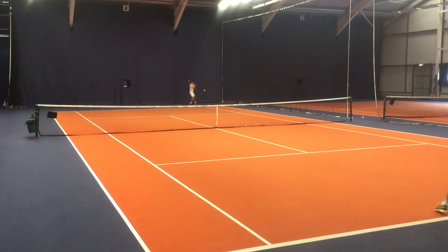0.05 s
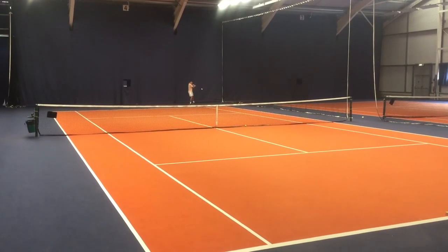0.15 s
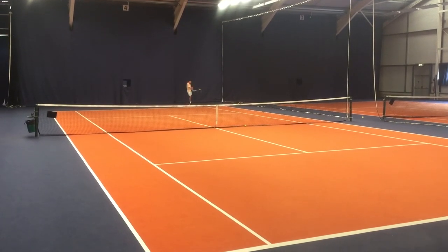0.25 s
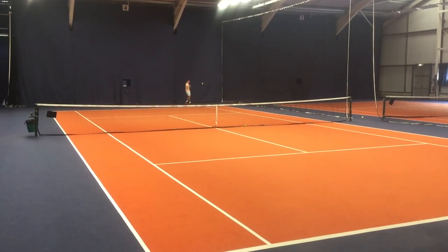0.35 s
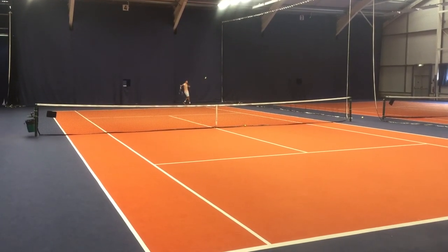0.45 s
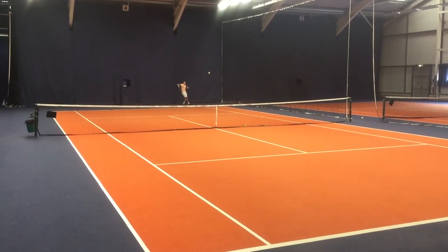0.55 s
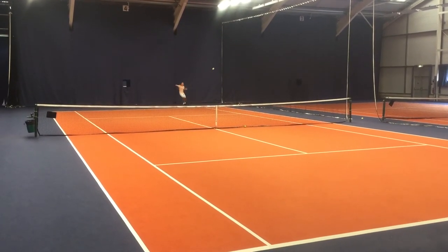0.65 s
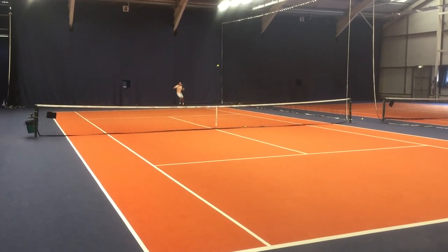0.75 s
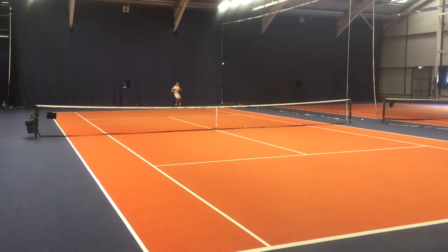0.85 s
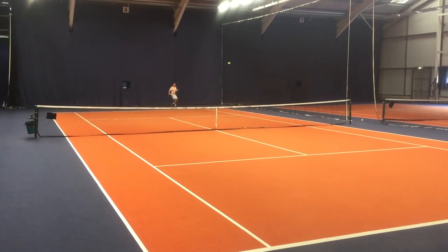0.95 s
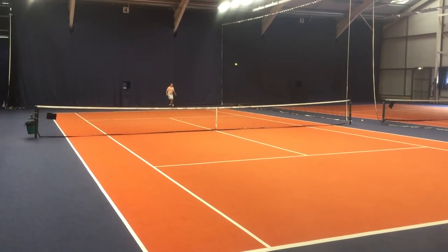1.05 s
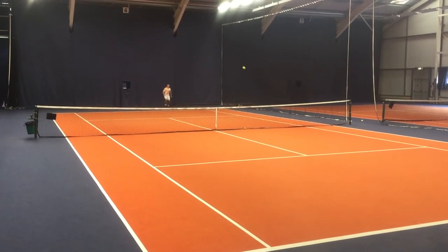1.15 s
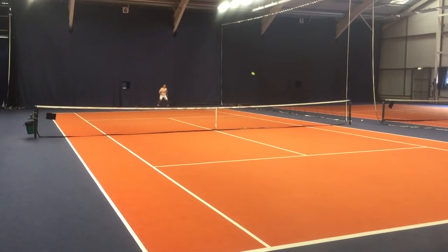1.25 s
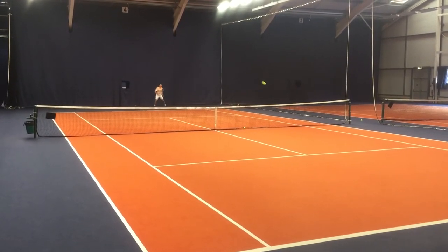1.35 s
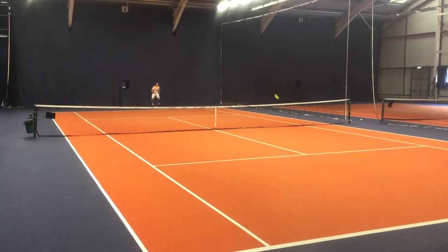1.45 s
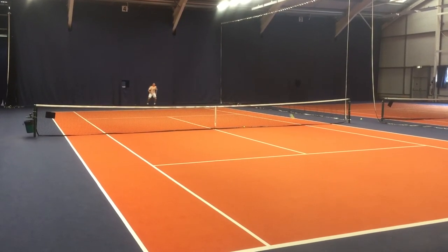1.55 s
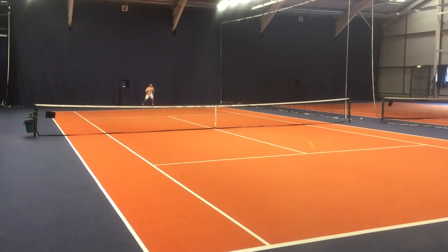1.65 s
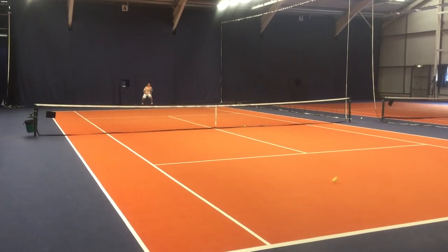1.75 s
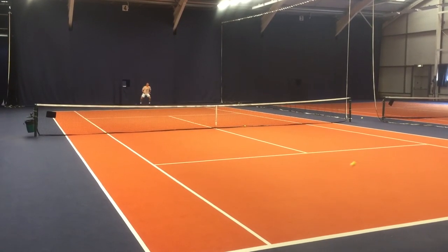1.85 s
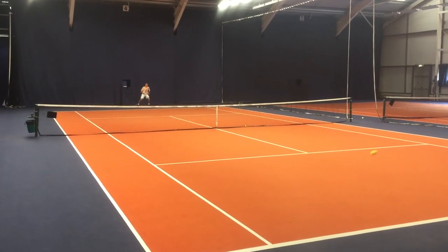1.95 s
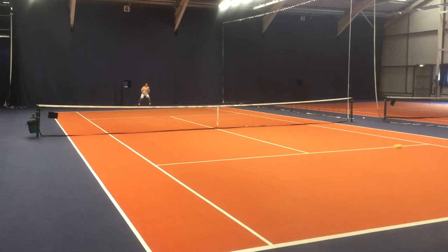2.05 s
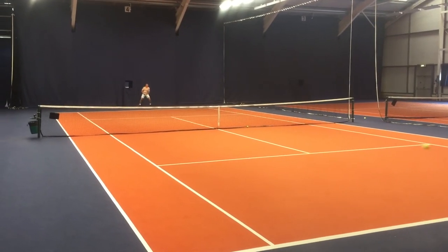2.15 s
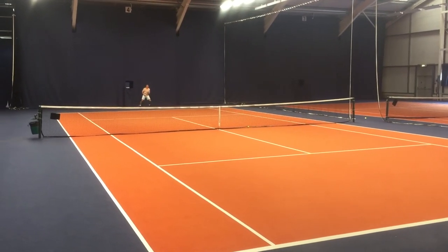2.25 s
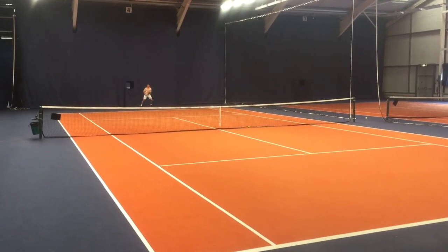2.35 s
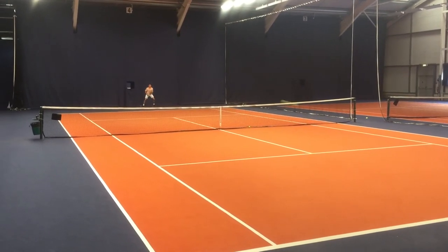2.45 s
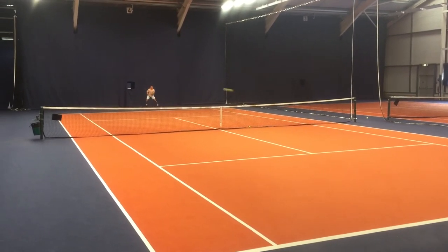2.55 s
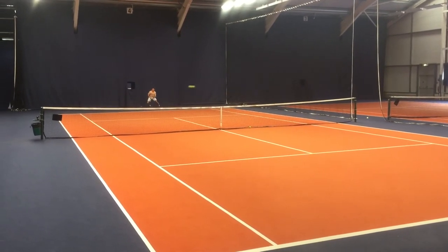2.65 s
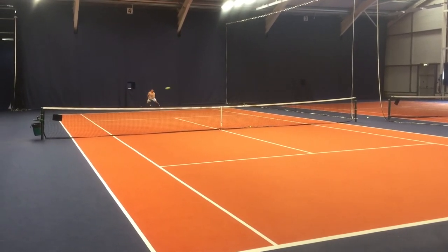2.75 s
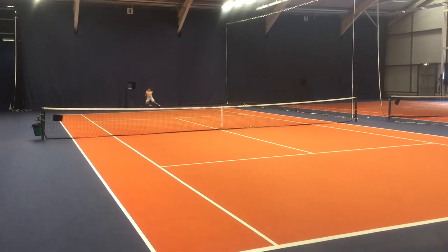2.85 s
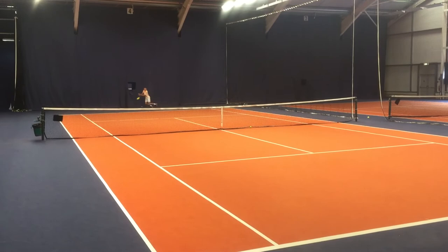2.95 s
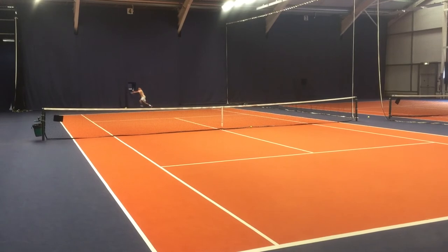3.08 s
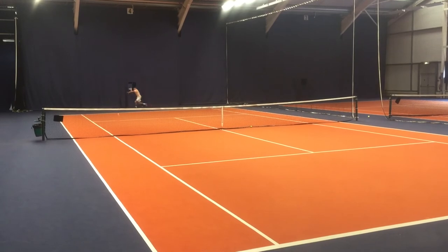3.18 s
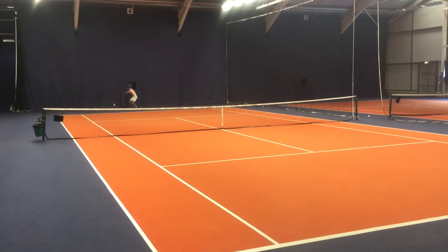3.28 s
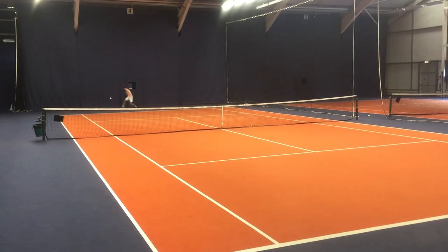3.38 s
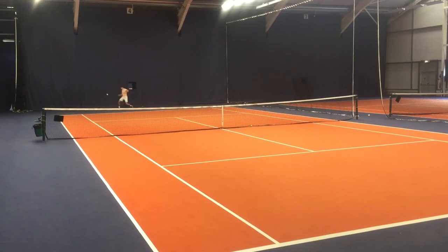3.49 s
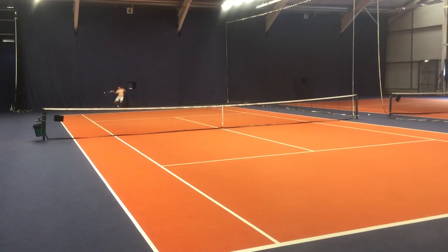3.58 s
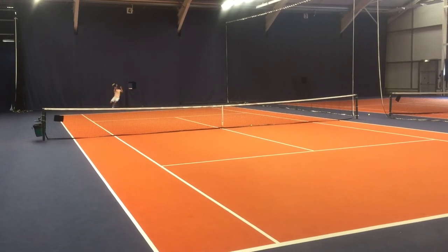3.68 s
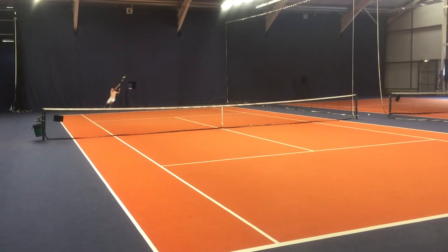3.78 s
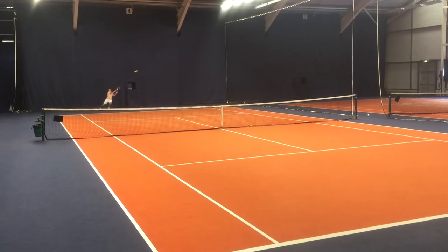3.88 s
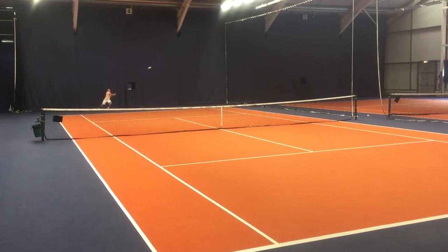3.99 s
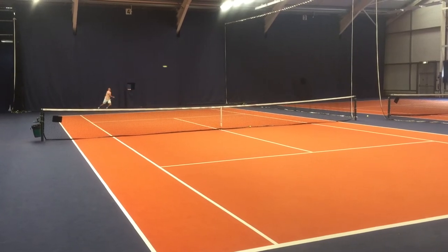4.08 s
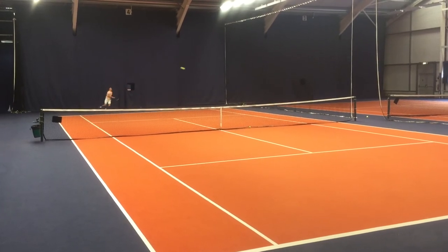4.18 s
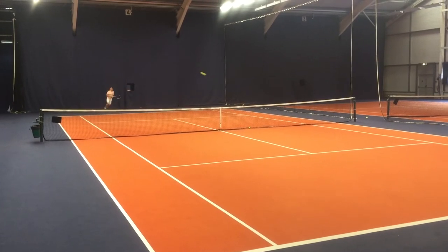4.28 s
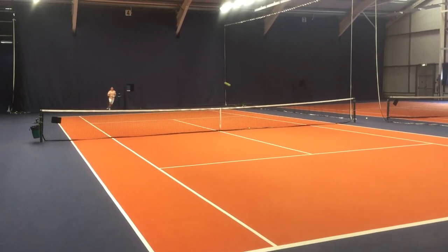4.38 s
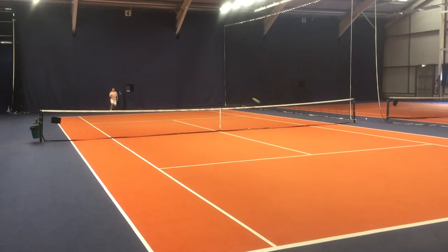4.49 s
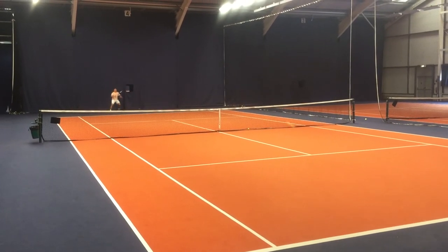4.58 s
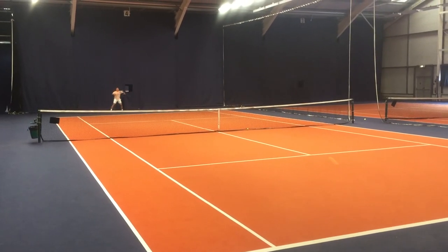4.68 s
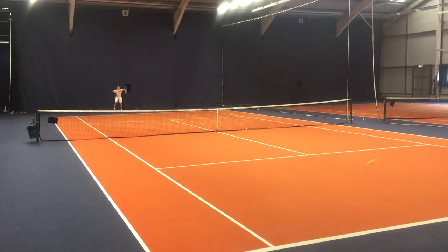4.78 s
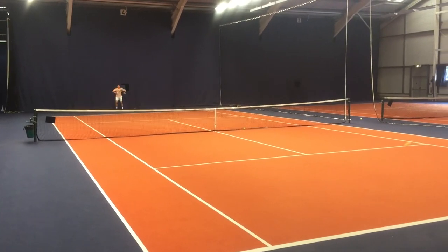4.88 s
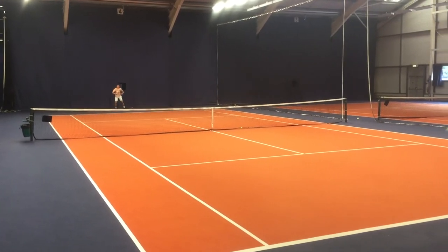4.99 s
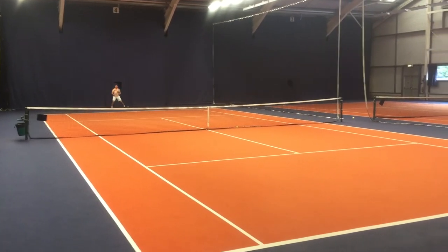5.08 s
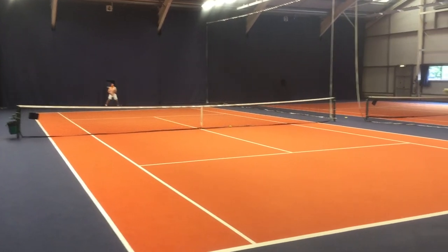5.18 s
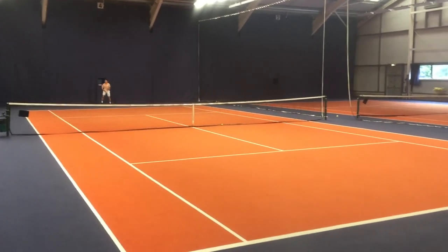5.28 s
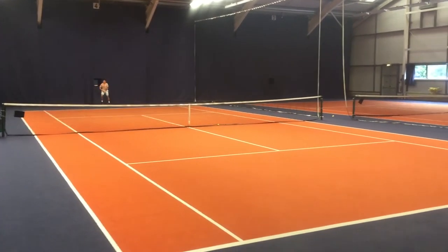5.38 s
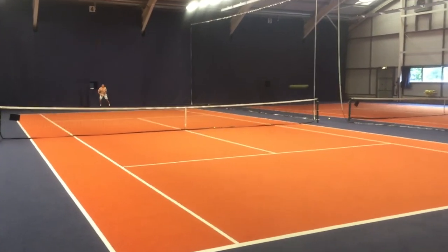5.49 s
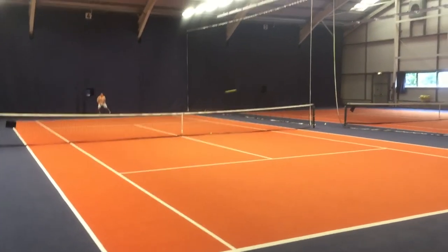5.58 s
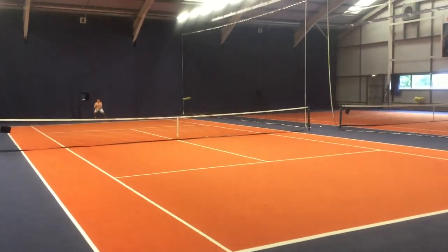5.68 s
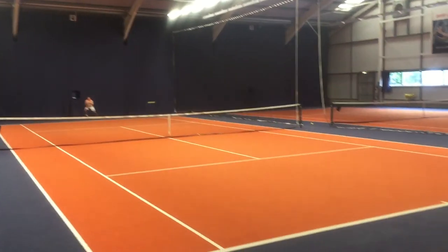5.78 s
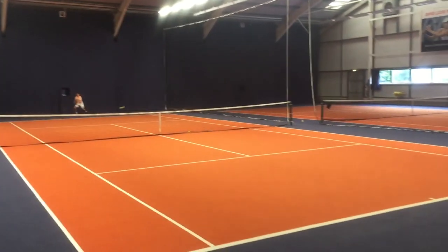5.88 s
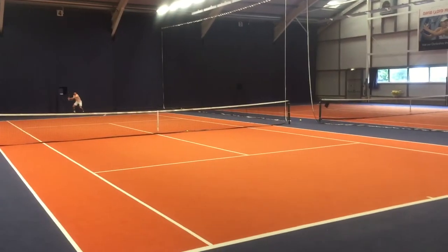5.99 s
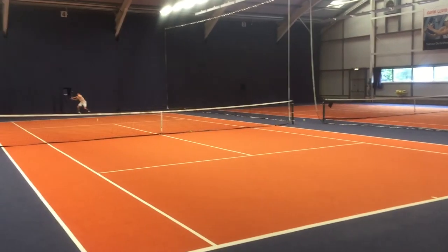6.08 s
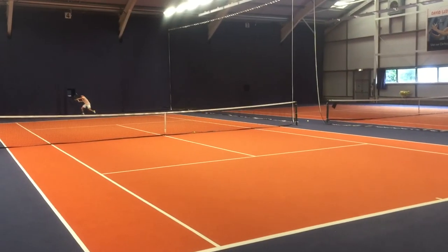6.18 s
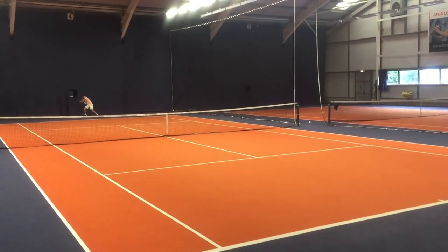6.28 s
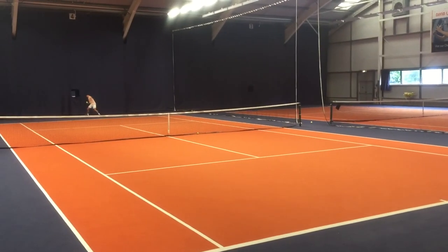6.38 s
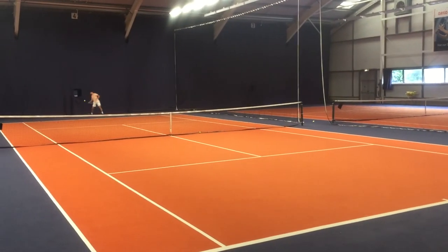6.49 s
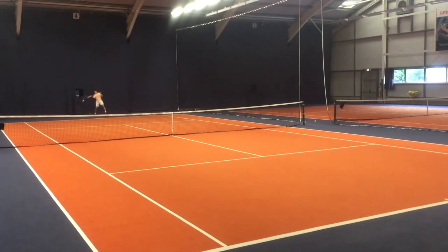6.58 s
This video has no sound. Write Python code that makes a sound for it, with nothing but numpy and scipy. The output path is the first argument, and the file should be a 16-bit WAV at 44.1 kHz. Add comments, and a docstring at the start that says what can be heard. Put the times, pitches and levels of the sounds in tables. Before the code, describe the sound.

Racket strokes pop back and forth across a reverberant indoor tennis court, with dull ball bounces, scuffing soles, one sliding squeal and a faint hum.

```python
"""A tennis rally in a large indoor hall, heard from behind the near baseline.
Each stroke and bounce is a noise crackle plus decaying sine modes, with filtered single echoes and a long noise tail.
The tail of a stroke before the start is still dying away as the scene opens.
Shoes scuff, squeal and squeak in noise bands and gliding tones, and rackets swish.
A wavering ventilation hum, duct rumble and steady air noise lie under it all."""
import sys
import numpy as np
from scipy import signal
from scipy.fft import rfft, irfft
from scipy.io import wavfile
from scipy.ndimage import map_coordinates

SR = 44100
rng = np.random.default_rng(int(sys.argv[2]) if len(sys.argv) > 2 else 0)


def transcribe(u):
    """Save the signal u as a 16-bit wav file named by the first command-line argument.

    u: samples, shape (n,) or (channels, n), limited to [-1, 1]; the rate is SR.
    q: integer samples, one column per channel.
    """
    v = np.clip(np.atleast_2d(u).T, -1, 1)
    q = np.round(v * 32767).astype(np.int16)
    wavfile.write(sys.argv[1], SR, q)


N = 292824


def undb(db):
    """Turn dB into an amplitude factor."""
    return 10 ** (np.asarray(db) / 20)


def level(x, db):
    """Scale x to the given rms level in dB."""
    return x * undb(db) / np.sqrt(np.mean(x ** 2))


def on_log(hz, table):
    """Read (Hz, value) points on a log-frequency axis."""
    points_hz, values = np.array(table).T
    return np.interp(np.log(np.maximum(hz, 1)), np.log(points_hz), values)


def shaped(size, db_of):
    """Noise of rms 1 whose spectrum follows the given curve in dB per Hz."""
    spectrum = rfft(rng.standard_normal(size))
    gain = undb(db_of(np.fft.rfftfreq(size, 1 / SR)))
    return level(irfft(spectrum * gain, size), 0)


def peak(hz, centre_hz, width_hz):
    """Gain in dB of a resonance, 0 at its centre."""
    detuning = (hz - centre_hz ** 2 / np.maximum(hz, 1)) / width_hz
    return -10 * np.log10(1 + detuning ** 2)


def wander(t, step):
    """Random curve of straight lines between normal draws, one every `step` samples."""
    knots = t[::step]
    return np.interp(t, knots, rng.standard_normal(len(knots)))


def add(out, x, s):
    """Mix x into out from s seconds on."""
    i = int(round(s * SR))
    part = x[max(-i, 0):N - i]
    out[max(i, 0):max(i, 0) + len(part)] += part


# Steady air noise, spectrum relative to itself. Columns: f/Hz, level/dB per Hz
AIR_SPECTRUM = [(65, -34), (110, -1), (253, -9.5), (400, -19.5), (703, -20.5), (884, -18), (1000, -32),
                (1340, -31), (1490, -34), (1910, -30), (2210, -35), (3720, -39), (16000, -52.5)]
AIR_DB = -56.5  # rms


def air_noise():
    """Steady broadband noise of moving air."""
    return undb(AIR_DB) * shaped(N, lambda f: on_log(f, AIR_SPECTRUM))


# Duct rumble in two bands. Columns: t/s, low band level/dB, upper band level/dB
RUMBLE_LEVELS = [(0.0, -56, -53.5), (0.652, -56, -73), (0.78, -50, -48), (1.22, -47, -82), (1.27, -48, -49),
                 (1.48, -48, -67), (1.85, -50.5, -43), (2.27, -50.5, -51.5), (3.05, -58, -53),
                 (3.29, -59, -57), (3.33, -56, -49.5), (4.18, -54, -56.5), (4.44, -55, -47),
                 (5.25, -57, -54.5), (5.6, -56, -42), (5.68, -57, -51), (6.38, -48, -61), (6.64, -58, -50)]


def duct_rumble():
    """Two narrow bands of low noise, each rising and sinking on its own."""
    t = np.arange(N) / SR
    s, low_db, upper_db = np.transpose(RUMBLE_LEVELS)
    low = undb(np.interp(t, s, low_db)) * shaped(N, lambda f: 2 * peak(f, 56.3, 11))
    upper = undb(np.interp(t, s, upper_db)) * shaped(N, lambda f: 2 * peak(f, 77.4, 18))
    return low + upper


# Ventilation hum before its random waver. Columns: t/s, level/dB
HUM_LEVELS = [(0.0, -46), (0.15, -57), (0.41, -44.5), (0.53, -59), (1.53, -56.5), (1.66, -49.5),
              (1.72, -72), (2.12, -66), (2.16, -39), (2.24, -64.5), (2.57, -40.5), (2.64, -67), (2.74, -44),
              (3.72, -52.5), (4.6, -52.5), (4.64, -56.5), (4.97, -44.5), (5.18, -63), (5.46, -47),
              (5.82, -55.5), (5.94, -40), (6.27, -38), (6.55, -55.5), (6.64, -48)]
HUM_HZ, WAVER_HZ, WAVER_DB = 99.8, 1.53, 2  # mean pitch; random spread of pitch and level


def ventilation_hum():
    """A single low sine whose level and pitch waver."""
    t = np.arange(N) / SR
    s, db = np.transpose(HUM_LEVELS)
    loudness = np.sqrt(2) * undb(np.interp(t, s, db) + WAVER_DB * wander(t, 4096))
    pitch_hz = HUM_HZ + WAVER_HZ * wander(t, 4096)
    return loudness * np.sin(2 * np.pi * np.cumsum(pitch_hz) / SR)


def ventilation():
    """Hum, duct rumble and air noise together."""
    return ventilation_hum() + duct_rumble() + air_noise()


# Small dry ticks. Columns: t/s, level/dB before the decay
TICK_EVENTS = [(1.895, -76), (2.872, -69), (2.903, -53.5), (2.919, -61), (3.02, -65)]


def ticks():
    """Tiny bursts of bright noise that die within milliseconds."""
    out = np.zeros(N)
    t = np.arange(SR // 100) / SR
    for s, db in TICK_EVENTS:
        noise = shaped(len(t), lambda f: 2 * peak(f, 5200, 3600))
        add(out, undb(db) * np.exp(-t / 0.0028) * noise, s)
    return out


RUB_STEEPNESS, HISS_STEEPNESS = 2.2, 1.2  # how fast a band falls away; hiss spreads far into the treble
FULL_WASH_S = 0.072  # shorter bursts leave less in the hall


def rub(length, db, hz, width_hz, rise, steepness=RUB_STEEPNESS):
    """A gritty noise burst with a short wash in the hall; rise is a share of the length."""
    t = np.arange(int((length + 0.24) * SR)) / SR
    shape = np.sin(np.pi / 2 * np.interp(t, [0, rise * length, length], [0, 1, 0])) ** 2
    # the wash is worked out on every 64th sample
    coarse = t[::64]
    wash = np.convolve(shape[::64], undb(-60 * coarse / 3.9))[:len(coarse)]
    wash = np.repeat(wash / wash.max(), 64)[:len(t)] * (1 - t / t[-1])
    shape = shape + 0.38 * min(length / FULL_WASH_S, 1) ** 2 * wash
    grit = undb(3 * wander(t, 128))
    bands_db = 2.5 * rng.standard_normal(SR // 600)  # uneven bands roughen the colour
    bands_hz = np.linspace(0, SR / 2, len(bands_db))

    def colour(f):
        return steepness * peak(f, hz, width_hz) + np.interp(f, bands_hz, bands_db)

    return undb(db) * shape * grit * shaped(len(t), colour)


# Shoes on the court, and at 5.183 s a soft return of the bounce from the far wall;
# levels before envelope and grit. Columns: t/s, length/s, lower-body f/Hz, width/Hz, level/dB
# of the main (sole) band, then hiss f/Hz, hiss level/dB
SCUFF_EVENTS = [(.0, 0.17, 1200, 400, -80, 3330, -73), (.06, .017, 5200, 300, -65, 3000, -85),
                (0.2, 0.016, 4700, 400, -71, 3000, -92), (1.344, 0.073, 1100, 200, -58, 3100, -68),
                (1.362, 0.069, 1720, 500, -60.5, 2400, -72), (1.527, 0.37, 1890, 900, -75, 3200, -75),
                (1.616, 0.09, 1110, 400, -53, 3160, -70.5), (1.624, 0.054, 2180, 120, -73, 3000, -85),
                (1.666, 0.057, 1040, 500, -53, 2800, -73), (1.702, 0.03, 1200, 400, -75, 9500, -78),
                (2.158, 0.087, 1080, 885, -61, 2500, -92), (2.206, 0.29, 1890, 90, -75.5, 3000, -94),
                (2.458, 0.079, 1130, 220, -57.5, 1800, -65.5), (3.28, 0.037, 1200, 400, -79, 3420, -69),
                (3.44, 0.16, 1170, 500, -58.5, 3000, -78), (3.586, 0.042, 1030, 400, -54, 3000, -83),
                (3.657, 0.038, 5350, 450, -67, 4300, -64.5), (3.676, 0.083, 1700, 900, -59, 3320, -68),
                (3.704, 0.074, 1040, 604, -46, 2860, -65.5), (5.056, .043, 1200, 400, -75, 3500, -76),
                (5.183, .08, 1020, 350, -63.5, 1400, -76), (6.345, 0.031, 1200, 400, -77, 3000, -70)]
SCUFF_RISE, HISS_WIDTH = 0.15, 0.27  # share of the length; share of the hiss centre


def scuffs_and_return():
    """Each row is a main band (a rubbing sole, or the wall's return) with a hiss band, usually higher in pitch."""
    out = np.zeros(N)
    for s, length, main_hz, width_hz, main_db, hiss_hz, hiss_db in SCUFF_EVENTS:
        add(out, rub(length, main_db, main_hz, width_hz, SCUFF_RISE), s)
        add(out, rub(length, hiss_db, hiss_hz, HISS_WIDTH * hiss_hz, SCUFF_RISE, HISS_STEEPNESS), s)
    return out


# Squeal bands of the slide, levels before envelope and grit.
# Columns: f/Hz, level/dB, share of the slide length
SQUEAL_BANDS = [(1700, -60, 0.32), (2180, -79, .45), (2930, -68, 0.37), (3880, -71, 0.98),
                (4200, -64, 0.35), (4850, -77, 0.64), (5400, -72, 0.4), (5830, -76, 0.97),
                (6700, -72.5, .5), (8600, -84, .3), (9500, -82, 0.3)]
SLIDE_S, SLIDE_LENGTH_S, SLIDE_RISE = 5.27, 0.31, 0.46  # start; length; rise as a share of the length
SQUEAL_WIDTH_HZ = 210
SCRAPE_HZ, SCRAPE_WIDTH_HZ, SCRAPE_DB = 1440, 1160, -57  # broad rubbing under the squeal
GRIT_HZ, GRIT_DB = 4600, -76  # sandy hiss


def slide():
    """One long slide: broad scrape, sandy hiss, and squeal bands that all peak together."""
    out = np.zeros(N)
    add(out, rub(SLIDE_LENGTH_S, SCRAPE_DB, SCRAPE_HZ, SCRAPE_WIDTH_HZ, SLIDE_RISE), SLIDE_S)
    add(out, rub(SLIDE_LENGTH_S, GRIT_DB, GRIT_HZ, GRIT_HZ, SLIDE_RISE, HISS_STEEPNESS), SLIDE_S)
    for hz, db, share in SQUEAL_BANDS:
        start = SLIDE_S + SLIDE_RISE * SLIDE_LENGTH_S * (1 - share)
        add(out, rub(share * SLIDE_LENGTH_S, db, hz, SQUEAL_WIDTH_HZ, SLIDE_RISE), start)
    return out


def squeak(length, first_hz, last_hz, db):
    """Stick and slip at a gliding, wobbling rate, with two overtones."""
    t = np.arange(int(length * SR)) / SR
    glide_hz = np.linspace(first_hz, last_hz, len(t)) * (1 + 0.02 * wander(t, 128))
    phase = 2 * np.pi * np.cumsum(glide_hz) / SR
    tone = sum(undb(-16 * k) * np.sin((k + 1) * phase) for k in range(3))  # each overtone 16 dB down
    return undb(db) * np.sqrt(2) * np.sin(np.pi * (t / length) ** 0.89) * tone


# Soles that catch and sing briefly, pitch before its wobble, level before the envelope.
# Columns: t/s, length/s, first f/Hz, last f/Hz, level/dB
SQUEAK_EVENTS = [(1.362, 0.046, 1116, 1076, -58), (1.632, .03, 1290, 1090, -57),
                 (1.672, 0.052, 1180, 1065, -59), (2.466, 0.033, 1200, 1160, -61),
                 (5.476, .028, 1350, 1320, -54)]


def squeaks():
    """The short singing squeaks of the soles."""
    out = np.zeros(N)
    for s, *row in SQUEAK_EVENTS:
        add(out, squeak(*row), s)
    return out


SWING_S, SWISH_HZ, SWISH_WIDTH_HZ = 0.05, 3500, 3500  # the racket nears the ball
SWISH_DB = {"near": -55, "far": -66.5}


def swishes():
    """Air rushes past the racket, swelling up to each stroke."""
    out = np.zeros(N)
    for s, kind, *_ in BLOW_EVENTS:
        if kind in SWISH_DB:
            add(out, rub(SWING_S, SWISH_DB[kind], SWISH_HZ, SWISH_WIDTH_HZ, 0.95), s - SWING_S)
    return out


# Spectrum of a blow in the hall, relative to itself. Columns: f/Hz, level/dB per Hz
BLOW_COLOUR = [(60, -20), (110, -9.5), (260, -4), (600, -7), (1000, -13), (1250, -16), (2300, -21),
               (2600, -25), (2850, -27), (3400, -26.5), (4600, -28.5), (5000, -31.5), (8500, -40),
               (16000, -67)]
# Broad rings in the hall, before each event's own lifts.
# Columns: f/Hz, width/Hz, then level/dB after a near stroke, a far stroke, a bounce
HALL_RINGS = [(292, 51, 2.5, -1, 18), (520, 340, -6, 0.5, -18), (1130, 240, -6.5, -11, 11),
              (2346, 580, 1.5, 4, -4), (4300, 740, 2, 2.5, -7), (2900, 500, -9, 1, -2),
              (1700, 255, 2.5, 2.5, -8)]
KINDS = ["near", "far", "bounce"]  # order of the level columns
# edges of the lifted regions
STRINGS_HZ, FRAME_HZ, PRESENCE_HZ, UPPER_RING_HZ, TOP_RING_HZ = 400, 700, 1500, 2800, 4000


def hall_colour(kind, ball_hz, ball_width_hz, ball_db, tilt_db, bass_db,
                presence_db=0, strings_db=0, upper_db=0, top_db=0, frame_db=0):
    """Spectrum curve of one tail: the blow's colour, the ball's air, the hall's rings and a random comb."""
    ripple_db = 2.25 * rng.standard_normal(SR // 80)  # near reflections comb the colour
    ripple_hz = np.linspace(0, SR / 2, len(ripple_db))

    def colour(f):
        power = 1 + undb(2 * (ball_db + 2 * peak(f, ball_hz, ball_width_hz)))
        for hz, width_hz, *kind_db in HALL_RINGS:
            ring_db = kind_db[KINDS.index(kind)]
            ring_db += strings_db * (STRINGS_HZ < hz < FRAME_HZ)
            ring_db += frame_db * (FRAME_HZ < hz < PRESENCE_HZ)
            ring_db += presence_db * (hz > PRESENCE_HZ)
            ring_db += upper_db * (UPPER_RING_HZ < hz < TOP_RING_HZ)
            ring_db += top_db * (hz > TOP_RING_HZ)
            power = power + undb(2 * (ring_db + peak(f, hz, width_hz)))
        comb = np.interp(f, ripple_hz, ripple_db)
        tilt = tilt_db * np.log2(np.maximum(f / 1600, 1))
        bass = bass_db / (1 + (f / 750) ** 6)
        return on_log(f, BLOW_COLOUR) + 10 * np.log10(power) + tilt + bass + comb

    return colour


# Time the hall's late tail takes to fall 60 dB. Columns: f/Hz, decay/s
HALL_DECAY = [(100, 5.7), (260, 2.65), (700, 2.605), (1000, 2.41), (1840, 1.754), (3300, 1.36),
              (4500, 1.044), (5500, 1.05), (8000, 0.55), (12800, 0.23)]
PATCH_DB, PATCH_S, PATCH_HZ = 1.48, 0.0491, 780  # depth and size of the patches


def late_tail(noise):
    """Noise decays at its own rate in each band, swelling and sinking in patches of time and pitch."""
    f, frames, z = signal.stft(noise, SR, nperseg=512)
    grid = rng.standard_normal((64, 128))
    places = np.meshgrid(f / PATCH_HZ, frames / PATCH_S, indexing="ij")
    patches = map_coordinates(grid, places, order=1, mode="mirror")
    decay_db = -60 * frames / on_log(f, HALL_DECAY)[:, None]
    return signal.istft(z * undb(PATCH_DB * patches + decay_db), SR, nperseg=512)[1][:len(noise)]


RETURN_S, RETURN_WIDTH_S, RETURN_DB = 0.35, 0.13, 1.17  # sound back from across the hall lifts the tail


def tail(kind, late_db, early_db, ball_hz, ball_width_hz, ball_db, swell, *balance_db):
    """Countless echoes in the blow's colour: a quick early cluster and a long tail, treble dying first."""
    colour = hall_colour(kind, ball_hz, ball_width_hz, ball_db, *balance_db)
    t = np.arange(4 * SR) / SR
    late = late_tail(shaped(len(t), colour))
    early = shaped(len(t), colour) * undb(-60 * t / 0.56)
    # echoes come in clumps that even out with time
    clumps = undb(2.2 * np.exp(-t / 0.29) * wander(t, 256))
    back = undb(RETURN_DB * np.exp(-((t - RETURN_S) / RETURN_WIDTH_S) ** 2))
    answer = 1 - np.exp(-t / swell)  # the far walls take a while to answer
    mix = undb(late_db) * late * back * answer + undb(early_db) * early
    return mix * clumps * np.minimum(t / 0.0036, 1)


# What each bounce, near, too far off to be heard directly, or (at 3.43 s) on a neighbouring court, leaves in
# the hall; levels before decay. # Columns: t/s, late level/dB, early level/dB, ball-air f/Hz, ball-air
# width/Hz, ball-air level/dB
BOUNCE_TAIL_EVENTS = [(1.977, -60.5, -49, 1030, 171, 14.5), (3.161, -73, -78, 970, 150, 23),
                      (3.43, -50, -56, 980, 170, 16), (4.948, -51, -45, 963, 150, 16.5),
                      (6.33, -53.5, -52, 997, 170, -1)]
BOUNCE_SWELL_S, BOUNCE_TILT_DB, BOUNCE_BASS_DB = 0.07, -16.5, -9.5  # tilt per octave above 1600 Hz


def bounce_tails():
    """The dull hall tails of the bounces, coloured by the air in the ball."""
    out = np.zeros(N)
    for s, *hall in BOUNCE_TAIL_EVENTS:
        add(out, tail("bounce", *hall, BOUNCE_SWELL_S, BOUNCE_TILT_DB, BOUNCE_BASS_DB), s)
    return out


# What each stroke leaves in the hall; levels before decay.
# Columns: t/s, kind, late level/dB, early level/dB, ball-air f/Hz, ball-air width/Hz, ball-air level/dB,
# swell/s, treble tilt/dB per octave, then lifts: bass/dB, presence/dB, strings/dB, upper ring/dB,
# top ring/dB, frame ring/dB
STROKE_TAIL_EVENTS = [(-.48, "near", -28, -40, 860, 170, -4, .15, 1, -6, 2.5, -12, -9, -12, 9),
                      (.544, "far", -33.5, -28, 934, 106, 20, 0.037, 2, 2.5, -0.5, -3, -10, 5.5, 17.5),
                      (2.538, "near", -29.5, -30.5, 902, 153, 13.5, 0.11, 2.5, -2.9, 2.5, 5, 6, -1, -0.5),
                      (3.889, "far", -29.5, -25, 840, 173, 9, 0.045, 1.25, -2, 4, 6.5, 4, -3.5, -4),
                      (5.525, "near", -28, -29.5, 860, 111, 8.5, 0.097, 1.2, -5, 2.5, 5.5, 2, -9, 3.5)]


def stroke_tails():
    """The long hall tails of the strokes."""
    out = np.zeros(N)
    for s, kind, *hall in STROKE_TAIL_EVENTS:
        add(out, tail(kind, *hall), s)
    return out


# Single echoes at each end of the hall, delays before the spread factor.
# Columns: delay/s, level/dB, bright up to f/Hz, power of the spread factor
# (a step away from the near wall is a step towards the far one)
NEAR_END_ECHOES = [(.018, -10, 2200, 1), (.1435, -22.5, 10000, -.5)]
FAR_END_ECHOES = [(.0075, -2, 3500, 1), (.019, 1.1, 4500, 1), (.027, 1.1, 4000, 1), (.032, 0.5, 4000, 1),
                  (.041, -3, 3000, 1), (.069, -4, 2800, 1), (.084, -5, 2800, 1), (.097, -7, 2500, 1)]


def single_echoes(out, sound, s, kind, spread):
    """Walls, roof and floor throw back delayed, duller copies of a blow."""
    for delay, db, hz, power in FAR_END_ECHOES if kind == "far" else NEAR_END_ECHOES:
        dull = signal.butter(2, hz, fs=SR, output="sos")
        add(out, undb(db) * signal.sosfilt(dull, sound), s + delay * spread ** power)


# Modes of ball and racket (thud, shell, throat, strings, squeezed ball, air in the ball, then the frame),
# before each blow's pitch, length and level factors. Columns: f/Hz, 60 dB decay/s, then level/dB in the
# first near stroke, the second near stroke, a far stroke, a bounce
BLOW_MODES = [(152, 0.061, -4, -2.5, -21, -18), (220, 0.03, -23, -10, -19, 4.5),
              (332.4, 0.05, -11, -15.5, -6.5, -19), (457, 0.018, 5.5, 8, 4, -33),
              (801, 0.043, 0.5, -3.5, -11, -6.5), (1036, 0.017, 2, -31, -20.5, 6.5),
              (1374, 0.021, -4.5, -9, -9, -0.5), (1534, 0.041, -15, -9, -30.5, -12.5),
              (2003, 0.027, -9, -20, -12.5, -17), (2586, 0.011, -33, -11, -6, -20),
              (3480, 0.035, -23, -34, -18.5, -37), (3710, 0.025, -20, -19, -16.5, -38)]
CONTACTS = ["first near", "second near", "far", "bounce"]  # order of the level columns
BALL_AIR = 5  # row of the air in the ball
FREE_HZ = 700  # modes above this ring freely only when the ball leaves


def blow(contact, ring_db, tilt_db, air_db, pitch, crackle_db, crackle_hz, lead, held, ring):
    """Felt and strings crackle at the touch; the modes ring once the ball is squeezed."""
    t = np.arange(SR // 16) / SR
    crackle = shaped(len(t), lambda f: 2 * peak(f, crackle_hz, 4450))
    fade = np.exp(-t / 0.0038) + 0.092 * np.exp(-t / 0.025)
    out = undb(crackle_db) * crackle * fade * np.minimum(t / 0.0008, 1)
    for k, (hz, t60, *contact_db) in enumerate(BLOW_MODES):
        db = contact_db[CONTACTS.index(contact)] + ring_db
        db += tilt_db * np.log2(hz / 1000) + air_db * (k == BALL_AIR)
        # each mode also starts a fraction of its period late
        since = np.maximum(t - lead - 0.4 / hz - held * (hz > FREE_HZ), 0)
        rise = np.sin(np.pi / 2 * np.minimum(since / 0.0015, 1)) ** 2  # the ball flattens softly
        out = out - undb(db - 60 * since / (ring * t60)) * rise * np.sin(2 * np.pi * pitch * hz * since)
    return out


# Strokes and near bounces. Columns: t/s, kind, contact, ring level/dB, ring tilt/dB per octave,
# extra ball-air level/dB, pitch factor, crackle level/dB, crackle f/Hz, crackle lead/s, ball held/s,
# ring length factor, echo spread factor
BLOW_EVENTS = [(0.533, "far", "far", -23, -4, 27.5, 0.92, -40, 5900, 0.0016, 0.00069, 0.82, 0.99),
               (1.966, "bounce", "bounce", -24.5, 1.5, 0.1, 0.95, -58.5, 3500, 0.00043, 0.000086, 0.65, 0.78),
               (2.534, "near", "first near", -5, 3.3, -1, 0.95, -23, 3780, 0.0017, 0.0013, 0.53, 0.9),
               (3.8744, "far", "far", -10.5, 1.3, 14.5, 0.93, -34.5, 4500, 0.0016, 0.0007, 0.56, 0.77),
               (4.943, "bounce", "bounce", -28.5, -2, 5.5, 0.98, -70, 3500, 0.00044, 0.00019, 0.69, 0.9),
               (5.519, "near", "second near", -7.5, 4, -12, 1, -21, 2870, 0.001, 0.0037, 1, 1.12)]


def rally():
    """Every blow and its single echoes, with the hall tails of strokes and bounces."""
    out = stroke_tails() + bounce_tails()
    for s, kind, contact, *row, spread in BLOW_EVENTS:
        sound = blow(contact, *row)
        add(out, sound, s)
        single_echoes(out, sound, s, kind, spread)
    return out


def scene():
    """Ventilation, ticks, court sounds and rackets under the rally, in one channel."""
    court = scuffs_and_return() + slide() + squeaks()
    return (ventilation() + ticks() + court + swishes() + rally())[None]


def record(dry):
    """The microphone loses the deep bass and the recorder cuts the top."""
    thin = signal.sosfilt(signal.butter(3, 52, "high", fs=SR, output="sos"), dry)
    return signal.sosfilt(signal.ellip(8, 0.2, 70, 15900, fs=SR, output="sos"), thin)


dry = scene()
out = record(dry)
transcribe(out)
```